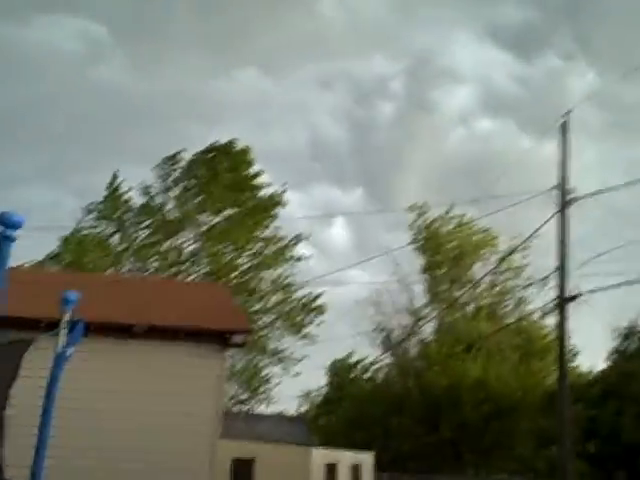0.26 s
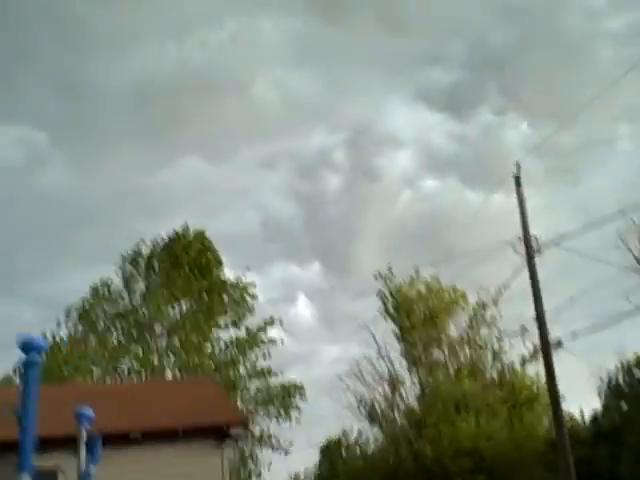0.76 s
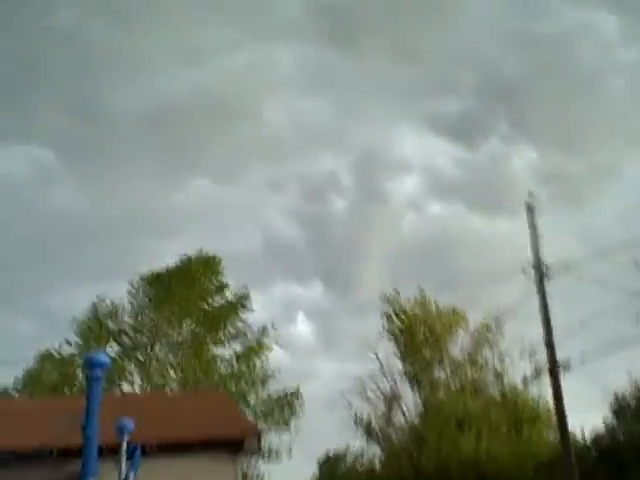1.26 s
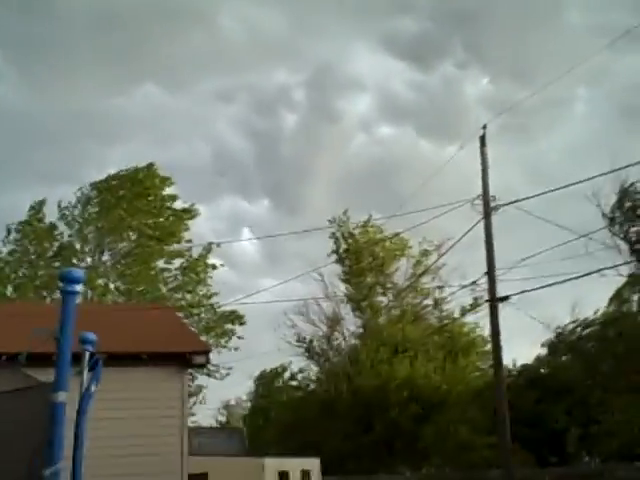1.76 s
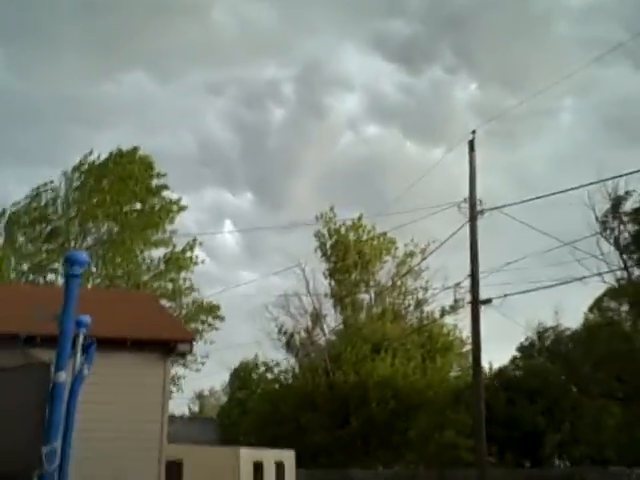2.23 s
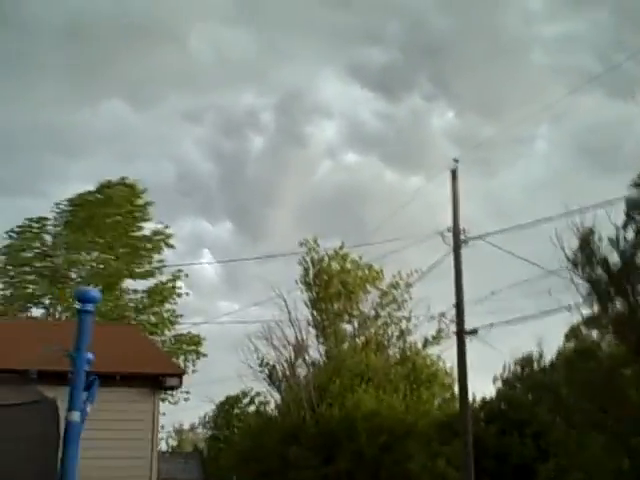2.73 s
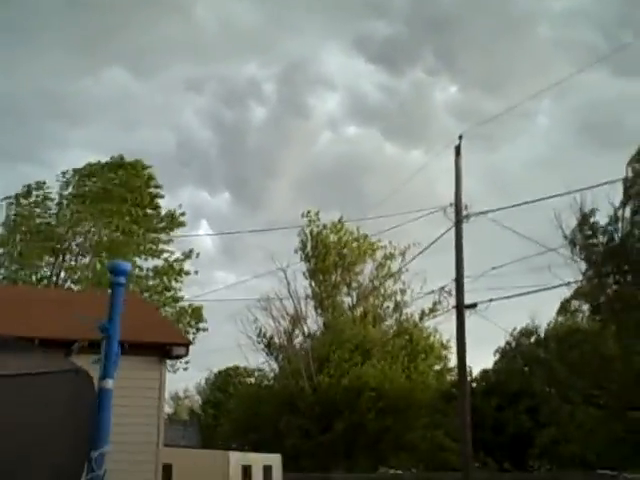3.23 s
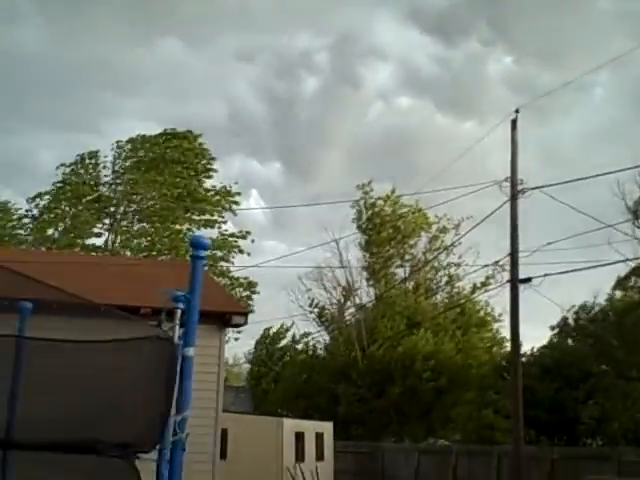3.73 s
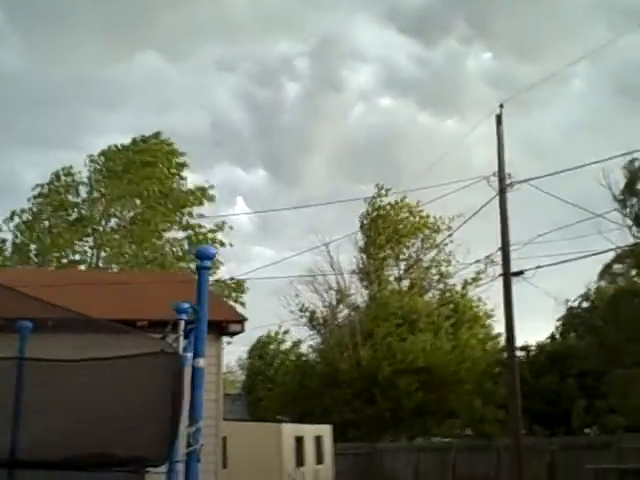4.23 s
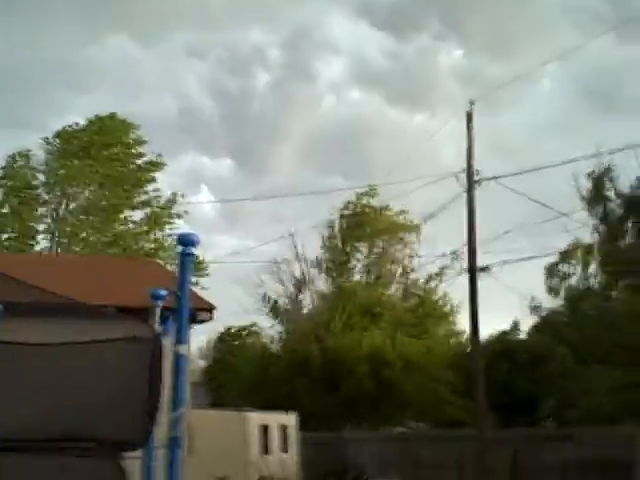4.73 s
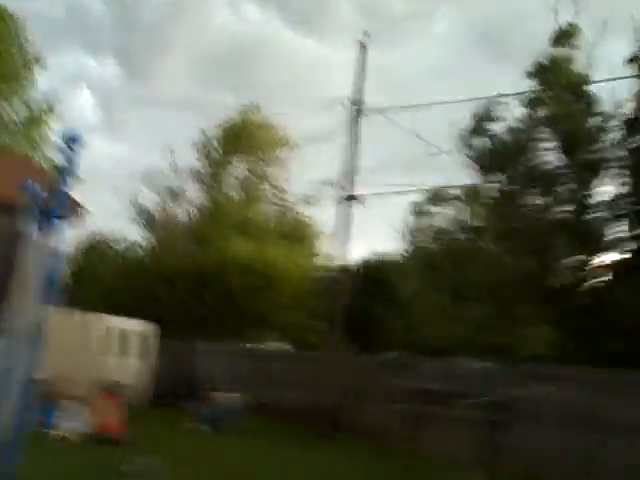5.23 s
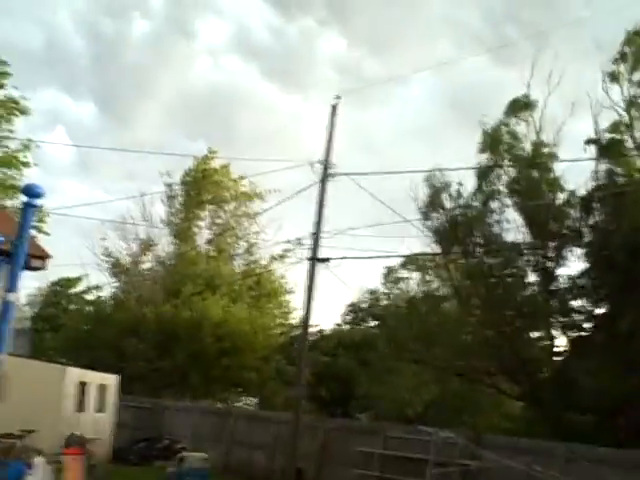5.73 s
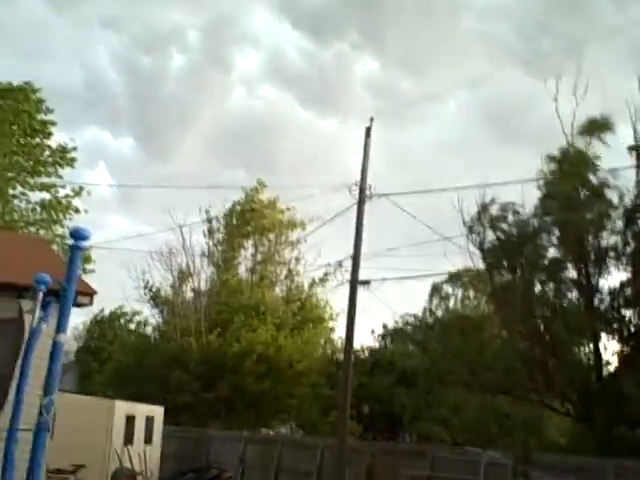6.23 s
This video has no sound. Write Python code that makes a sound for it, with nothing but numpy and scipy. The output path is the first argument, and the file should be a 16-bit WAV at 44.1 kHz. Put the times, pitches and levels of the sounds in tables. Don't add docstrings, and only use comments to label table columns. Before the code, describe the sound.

A gust strikes a bare microphone in an open yard immediately. From 0 to about 1.2 seconds, heavy low pushes boom and clip, with rapid knocks, breathy flutter and dense crackling spurts; the harshest, brightest burst comes near 1.1 seconds. The overload suddenly ducks the background several times, most deeply around 0.4. Between 1.2 and 2 seconds the blows are more separated, with another hard thump and sputter near 1.65 to 1.8. From 2 to 3.2 seconds the puffs become duller and sparser, with a last cluster of deep shoves around 2.7 to 2.9, while the rush of distant leaves climbs. After 3.3 only weak low bumps remain, until about 4.75. The leaf rush levels off near 3.9 and continues smooth and steady, flickering slightly. A faint dry twig crack comes at 4.8; the airy top dips briefly near 5.15, returns, and the hiss holds to the end at about 6.5.

```python
import sys
import numpy as np
from scipy import signal
from scipy.io import wavfile
from scipy.ndimage import uniform_filter1d

SR = 44100
rng = np.random.default_rng(int(sys.argv[2]) if len(sys.argv) > 2 else 0)


def persist_wave(psi):
    counts = np.round(np.clip(psi, -1, 1) * 32767).astype(np.int16)
    wavfile.write(sys.argv[1], SR, np.atleast_2d(counts).T)


def gain_from_db(level_db):
    decades = np.asarray(level_db, float) / 20
    return 10 ** decades


N = 286209

# (time [s], push [dB], quick knocks over slow heave [dB])
EDDY_PUSH = [(0, -16, 3), (.07, -14.5, -1), (.34, -11, 1.5), (.5, -18.5, -3.5), (1.15, -13.5, -6.5),
             (1.68, -11.5, -14), (1.8, -19, -5.5), (2.22, -15, -6.5), (2.4, -23, 1), (2.9, -16, -6.5),
             (2.97, -19, -0.5), (3.27, -45.5, -2.5), (3.35, -28, -3), (3.62, -26, -17.5),
             (4.29, -39.5, -2.5), (4.34, -26.5, -5.5), (5.08, -44, -6.5), (6.49, -44.5, -1)]
# (time [s], peak [dB], swing [Hz])
EDDY_SHOVES = [(0.076, 0.5, 40.7), (0.187, -13, 40), (0.334, 2.5, 53.5), (0.515, -4, 31.4),
               (0.619, -11, 54), (0.774, -13.5, 39.7), (0.854, -7, 33.3), (0.924, -5.5, 45.6),
               (0.985, -5, 34.4), (1.016, -19, 32.5), (1.1, -2, 31), (1.185, -2, 31), (1.24, -15, 37.2),
               (1.399, -9, 45), (1.447, -8, 32.6), (1.654, -3.5, 31), (1.759, -6.5, 93), (2.199, -8, 32.3),
               (2.726, -5.5, 59), (2.789, -11, 37.7), (2.88, -10.5, 31), (3.04, -16, 61), (3.33, -21, 59.2),
               (3.365, -17, 64.6), (3.512, -23.5, 33), (3.726, -23, 32.5), (3.806, -19.5, 44.5),
               (4.359, -23, 40.4), (4.475, -28, 68), (4.74, -23, 35.7)]
# (time [s], length [s], flutter [dB], brightness: treble over middle [dB])
AIR_PUFFS = [(0.042, 0.049, -16, -30), (.125, 0.04, -27, -59), (0.178, 0.2, -13, -24),
             (0.371, 0.026, -20, -15), (.41, 0.055, -29, -25), (0.483, 0.046, -14, -27.5),
             (0.562, 0.038, -19.5, -21), (0.613, 0.043, -26, -18.5), (0.677, 0.12, -26, -13),
             (0.816, 0.083, -21.5, -13.5), (0.914, 0.13, -21, -18), (1.047, .14, -18.5, -5.5),
             (1.19, 0.11, -26, -12), (1.329, 0.059, -23.5, -9.5), (1.401, 0.054, -23, -7.5),
             (1.479, 0.016, -28, -11), (1.543, 0.037, -28, -22), (1.616, 0.033, -27, -1.5),
             (1.658, 0.012, -22, -4.5), (1.765, .12, -24, -18.5), (1.901, 0.089, -28, -17),
             (2.035, 0.0073, -32, -18), (2.106, 0.17, -32, -17), (2.177, 0.27, -28, -22.5),
             (2.426, 0.13, -22.5, -21), (2.563, 0.093, -28.5, -28), (2.675, 0.034, -20.5, -44),
             (2.746, .09, -32, -54), (2.897, 0.0084, -37, -45), (3.036, 0.048, -33, -60)]
# (frequency [Hz], density [dB per Hz], share of the brightness this pitch follows [ratio])
EDGE_COLOUR = [(103, -0.5, 0), (291, 6.5, 0), (478, 0.5, 0), (968, 3.5, 1.09), (1570, -20.5, 0.34),
               (2620, -9.5, 1.83), (4050, -10, 6.5), (6670, -39.5, 2), (11900, -46, 2)]
# (time [s], treble peak [dB], middle over treble [dB], top over treble [dB])
STRONG_SPURTS = [(0.0778, -29, 17.5, -12.5), (0.1852, -20.5, 16, -19), (0.227, -19.5, 16.5, -34),
                 (0.242, -14.5, 6, -38), (0.281, -27.5, 21, -22), (0.3327, -15.5, -14, -29),
                 (.371, -17, 7.5, -23), (0.391, -23, -3, -28.5), (0.561, -24.5, 6, -31),
                 (0.636, -18.5, -6, -24), (0.7344, -20, -1, -35), (0.767, -20, 11, -28),
                 (.822, -22, 13.5, -27), (0.8545, -14.5, -3, -25), (0.887, -17.5, 8.5, -26),
                 (1.06, -12.5, -11, -30), (1.097, -7.5, -21, -23.5), (1.1185, -17, -3, -12.5),
                 (1.1987, -27, 15, -14), (1.3345, -18.5, 9.5, -27), (1.424, -17.5, 8, -41),
                 (1.4794, -27, 11, -36), (1.6598, -18.5, 13.5, -14), (1.8043, -20, 9, -23),
                 (1.865, -24, 6.5, -25), (2.105, -25.5, 12.5, -33), (2.31, -27.5, 11.5, -40),
                 (2.4496, -17, 7, -24), (2.5397, -22.5, 4.5, -36), (2.6415, -29.5, 15, -21)]
# (time [s], treble peak [dB])
SMALL_SPURTS = [(.1974, -15.5), (.254, -21.5), (.269, -19), (.3484, -22), (0.487, -35), (0.4995, -32),
                (.5194, -28), (0.5877, -25), (.697, -31), (.7761, -23), (.9388, -29), (0.992, -26),
                (1.1104, -14.5), (1.1583, -25), (1.178, -27), (1.254, -28.5), (1.3594, -27), (1.407, -22),
                (1.4396, -22), (1.6, -26.5), (1.616, -21), (1.637, -21.5), (1.667, -21.5), (2.204, -23),
                (2.2876, -33), (2.3366, -38), (2.376, -33), (2.434, -21.5), (2.5075, -30), (2.693, -34)]
# (time [s], peak [dB])
TWIG_SNAP = [
    (4.8178, -33),
]
# (frequency [Hz], density [dB per Hz])
LEAF_COLOUR = [(12, -20), (20, 0), (40, 10), (70, 5.5), (130, 5), (670, 0.5), (940, -1.5), (2500, -3.5),
               (4000, -8), (6650, -12), (10500, -18), (15800, -20)]
# (time [s], level above 10 kHz [dB])
NEAR_LEAVES = [
    (0, 1),
    (5.15, -4),
    (5.19, 0.5),
    (5.4, 0),
    (6.49, -1.5),
]
# (time [s], change [dB])
GAIN_DUCKS = [(.095, -4), (.345, -3), (.40, -8.5), (1.12, -4), (1.66, -4)]

GUST_END_S = 3.2


def in_time(rows):
    s, *columns = np.transpose(rows)
    return [np.interp(np.arange(N) / SR, s, c) for c in columns]


def at_hz(points, hz):
    known, *columns = np.transpose(points)
    return [np.interp(np.log(hz), np.log(known), c) for c in columns]


def rms_one(x):
    return x / np.sqrt(np.mean(x ** 2) + 1e-20)


def hiss():
    return rng.standard_normal(N)


def drift(rate):
    r = np.exp(-40 * np.pi * rate / SR)
    slow = signal.lfilter([1], [1, -2 * r, r * r], rng.standard_normal(N // 20 + 3002))[3000:]
    return np.interp(np.arange(N) / 20, np.arange(len(slow)), rms_one(slow))


def band(x, low_hz, high_hz):
    return signal.sosfilt(signal.butter(2, [low_hz, high_hz], "band", fs=SR, output="sos"), x)


def half_octaves(white, low, count):
    for k in range(count):
        edge = low * 2 ** (k / 2)
        yield edge * 2 ** .25, band(white[k % 2], edge, edge * np.sqrt(2))


def push(slack):
    push_db, quick_db = in_time(EDDY_PUSH)
    gusty = np.arange(N) < GUST_END_S * SR
    slack = np.maximum(slack, -16) * gusty
    push_db = push_db + .3 * slack
    quick_db = quick_db + .41 * slack

    lumps_db = 3.7 * np.tanh(2.6 * drift(8))
    heave = band(hiss(), 11, 34.6) + gain_from_db(-8) * band(hiss(), 30, 65)
    knocks = band(band(hiss(), 41.4, 160.3), 53.5, 237)
    heave = rms_one(heave * gain_from_db(lumps_db))
    knocks = rms_one(knocks * gain_from_db(lumps_db + 2.85 * drift(17.2)))
    return gain_from_db(push_db - 1.5) * (heave + gain_from_db(quick_db) * knocks)


def shoves():
    out = np.zeros(N)
    ways = rng.choice([-1, 1], len(EDDY_SHOVES))
    for (s, peak_db, hz), way in zip(EDDY_SHOVES, ways):
        turns = np.arange(8000) / SR * hz
        swing = np.sin(2 * np.pi * turns) * np.exp(-((turns - .55) / .39) ** 2)
        out[round(s * SR):][:len(turns)] += way * gain_from_db(peak_db + .5) * swing
    return out


def puffs():
    rise_db_per_s, fall_db_per_s = 1499.5, 447.5
    s, length, level_db, bright_db = np.transpose(AIR_PUFFS)[:, :, None]
    t = np.arange(N // 32 + 2) * 32 / SR
    before, after = np.maximum(s - t, 0), np.maximum(t - s - length, 0)
    slack = -rise_db_per_s * before - fall_db_per_s * after
    arch_db = 1 + 14.5 * length
    slack = slack - arch_db * np.clip(2 * (t - s) / length - 1, -1, 1) ** 2

    level_db = level_db + slack
    bright_db = bright_db + 1.1 * slack
    rules = np.argmax(level_db, axis=0)[None]
    curves = [np.take_along_axis(c, rules, axis=0)[0] for c in (level_db, bright_db, slack)]
    return [np.interp(np.arange(N) / SR, t, uniform_filter1d(c, size=5)) for c in curves]


def flutter(flutter_db, bright_db):
    size = round(GUST_END_S * SR)
    flutter_db, bright_db = flutter_db[:size], bright_db[:size]
    sputter = np.tanh((.3 * drift(25) + .7 * drift(110))[:size]) * 1.5
    dullest_db = np.minimum(bright_db + 41.5, 0)
    out = np.zeros(N)
    for hz, noise in half_octaves(rng.standard_normal((2, size)), 114, count=14):
        noise = band(noise, hz * .7, hz * 1.4)
        colour_db, share = at_hz(EDGE_COLOUR, hz)
        level_db = flutter_db + colour_db + share * np.minimum(bright_db, 0)
        octaves_up = max(np.log2(hz / 219), 0)
        level_db = level_db + .69 * octaves_up * dullest_db
        sputter_db = (4 + .75 * share) * sputter + drift(43)[:size]
        out[:size] += noise * gain_from_db(13 + level_db + sputter_db)
    return out


def spurts():
    half_length_s, lead_s = .0043, .04
    small_middle_db, small_top_db = 6, -30.5
    shapes, t = np.zeros((3, N)), np.arange(4400) / SR
    widths = half_length_s * np.array([[1.6], [1], [.7]])
    shape = np.exp(-((t - lead_s - 1.03 * half_length_s) / widths) ** 2)
    small = [(s, db, small_middle_db, small_top_db) for s, db in SMALL_SPURTS]
    for s, peak_db, middle_db, top_db in list(STRONG_SPURTS) + small:
        start = round((s - lead_s) * SR)
        levels_db = peak_db + np.array([[middle_db], [0], [top_db]])
        shapes[:, start:start + len(t)] += shape * gain_from_db(levels_db)

    struck = rng.random(N) < 4000 / SR
    tick_db = 3.5 * np.minimum(rng.exponential(1, N), 3)
    ticks = struck * gain_from_db(tick_db) * rng.choice([-1, 1], N)
    middle = band(band(hiss(), 211, 688), 150, 876)
    treble = band(band(ticks, 270, 1524), 400, 3100)
    top = band(band(ticks, 2200, 6500), 1800, 8500) + gain_from_db(-11.5) * band(ticks, 4400, 15000)
    out = gain_from_db(-9.5) * shapes[0] * rms_one(middle)
    out += gain_from_db(-12) * shapes[1] * rms_one(treble)
    return out + gain_from_db(-8) * shapes[2] * rms_one(top)


def twig():
    (s, peak_db), = TWIG_SNAP
    t = np.arange(N) / SR - s - .002
    return band(hiss(), 5000, 10000) * gain_from_db(peak_db - 2) * np.exp(-(t / .004) ** 2)


def rush_db():
    start_db, duck_s = -52, .008
    climb_from_s, climb_to_s = 2.053, 3.9
    t = np.arange(N) / SR
    ducked = sum(db * np.clip((t - s) / duck_s + .5, 0, 1) for s, db in GAIN_DUCKS)
    creep_from_s = GAIN_DUCKS[2][0]
    creep = 2.5 * (np.clip(t, creep_from_s, climb_from_s) - creep_from_s)
    climb = np.clip(t, climb_from_s, climb_to_s) - climb_from_s
    return start_db + ducked + creep + 12.5 * climb * (1 - .056 * climb)


def leaves():
    out, near_db = np.zeros(N), in_time(NEAR_LEAVES)[0]
    for hz, noise in half_octaves(rng.standard_normal((2, N)), 19.7, count=20):
        level_db = at_hz(LEAF_COLOUR, hz)[0] + .5 * drift(4.3) + near_db * (hz > 10000)
        out += gain_from_db(level_db) * noise
    return gain_from_db(rush_db() + 11.5) * rms_one(out)


def scene():
    flutter_db, bright_db, slack = puffs()
    wind = push(slack) + shoves() + flutter(flutter_db, bright_db) + spurts()
    return (wind + twig() + leaves())[None]


def band_limit(x):
    return signal.sosfilt(signal.butter(12, 16540, fs=SR, output="sos"), x)


def record(dry):
    overload, cutoff_hz = .715, 15750
    cut = signal.ellip(14, .2, 70, cutoff_hz, fs=SR, output="sos")
    mix = signal.sosfilt(cut, np.clip(dry, -overload, overload))
    return band_limit(mix)


dry = scene()
out = record(dry)
persist_wave(out)
```